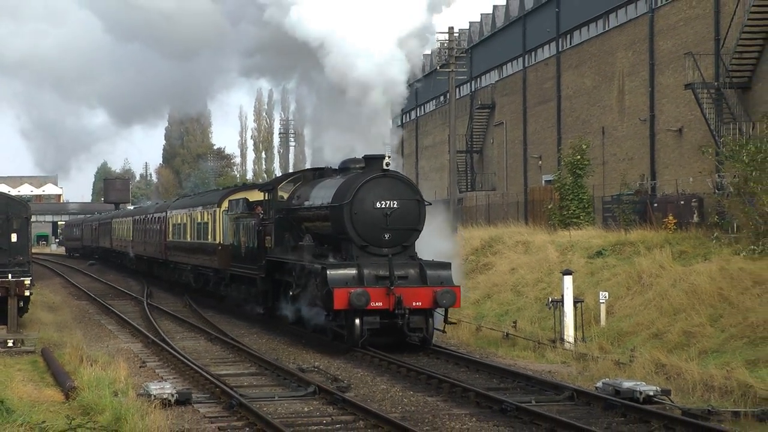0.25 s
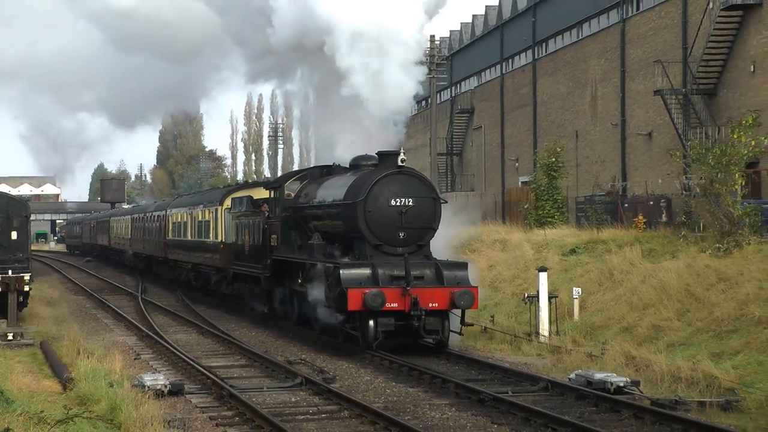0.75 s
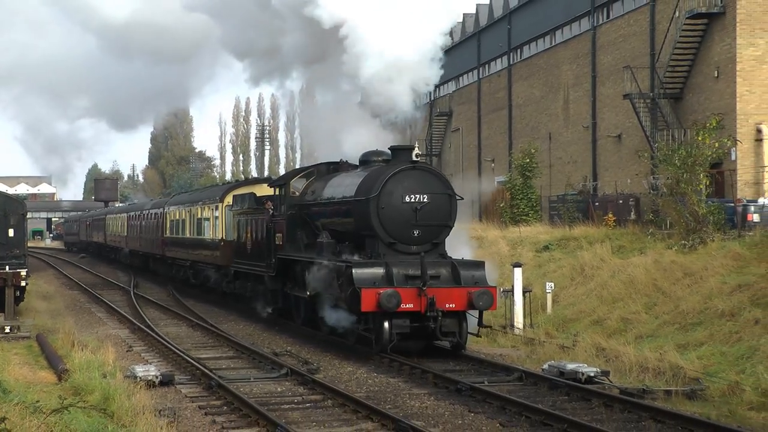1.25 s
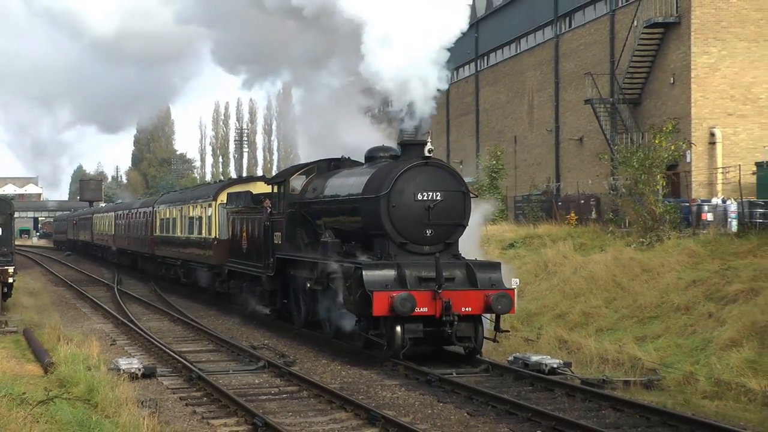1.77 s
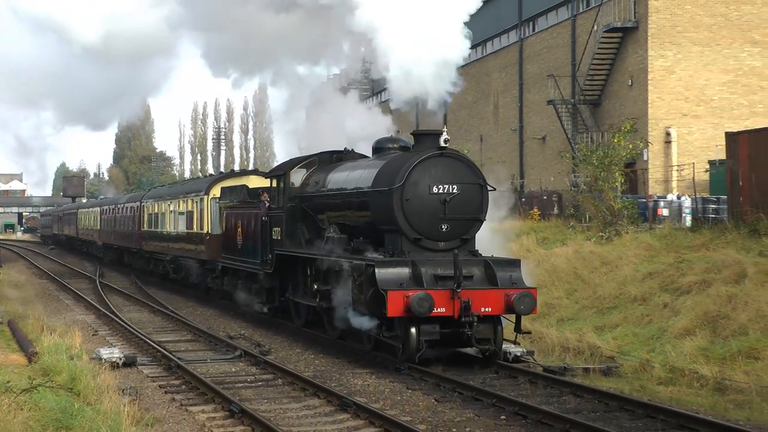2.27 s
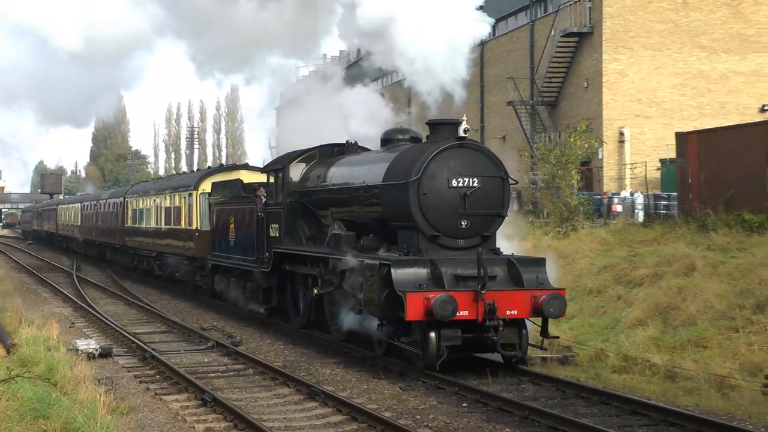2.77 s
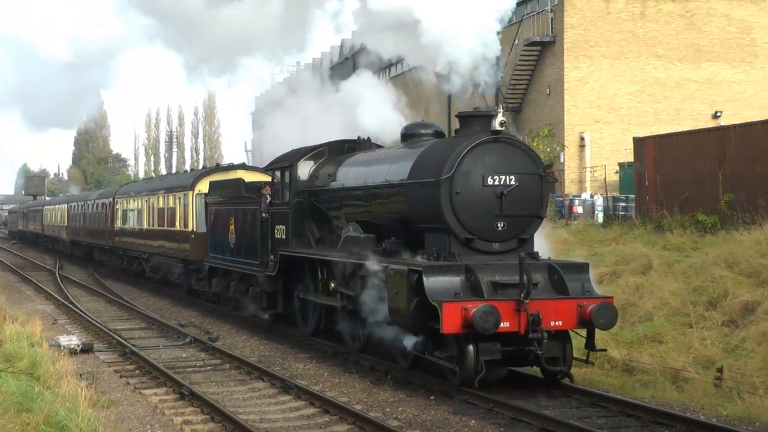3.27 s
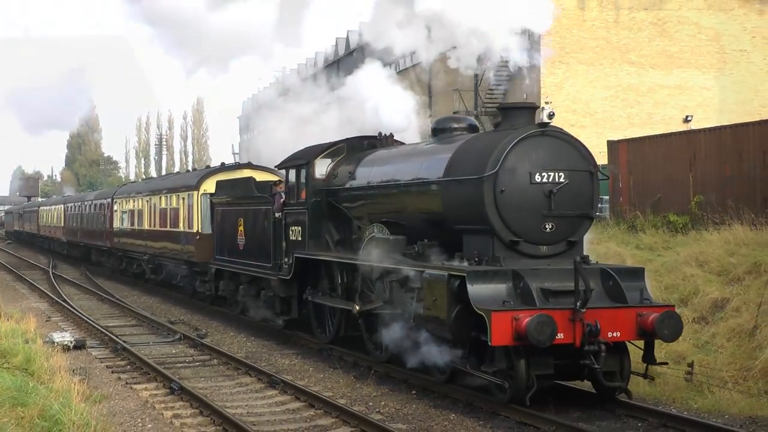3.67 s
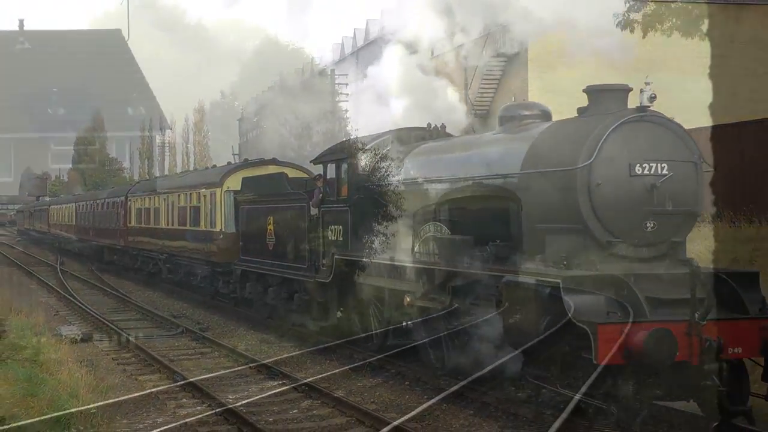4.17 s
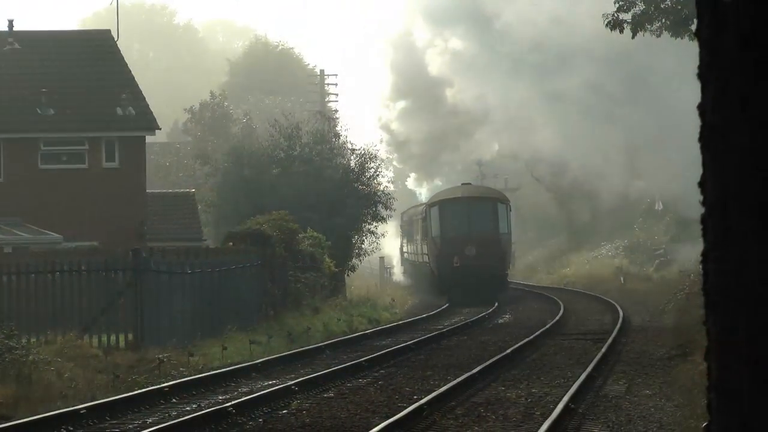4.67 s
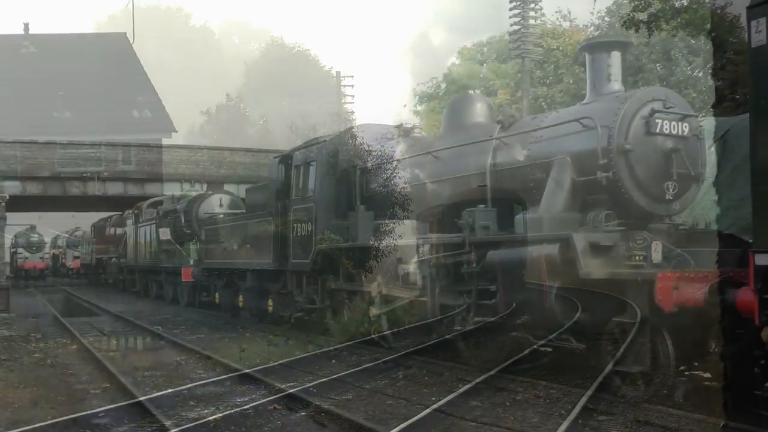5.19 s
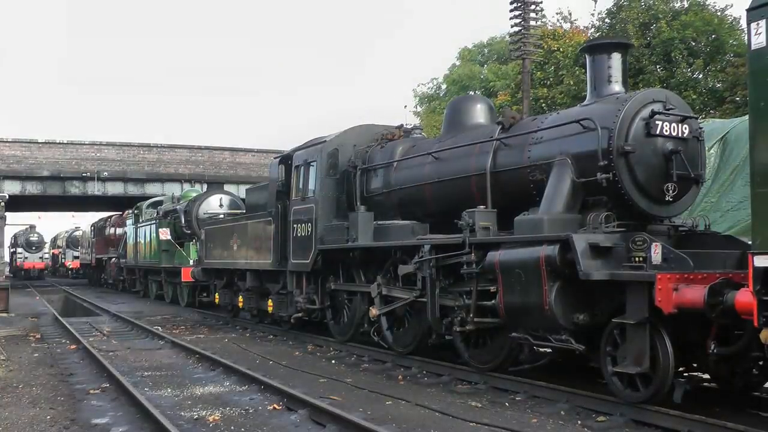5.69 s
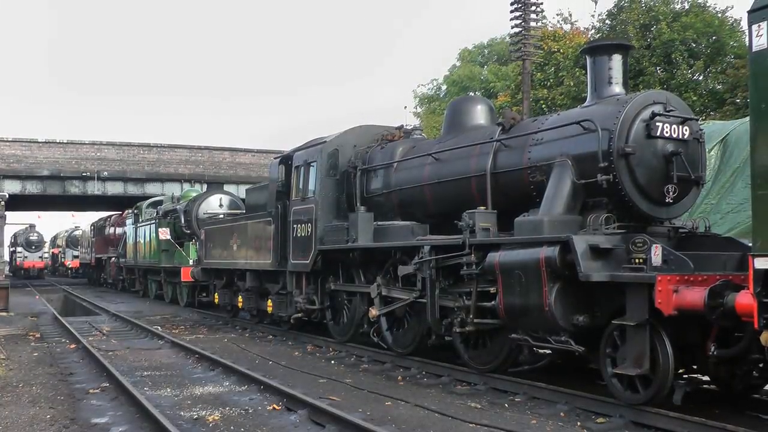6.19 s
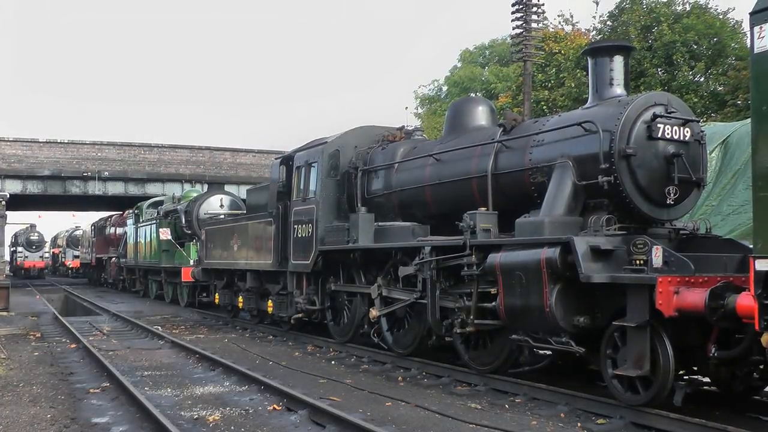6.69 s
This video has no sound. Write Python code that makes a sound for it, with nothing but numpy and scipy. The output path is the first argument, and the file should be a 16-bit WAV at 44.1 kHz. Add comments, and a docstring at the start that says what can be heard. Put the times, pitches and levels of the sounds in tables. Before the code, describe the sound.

Outdoors beside a railway, a steam engine pulls close by with rapid hollow chuffs, about five a second, over rumbling wheels and dense hissing steam. It fades quickly into a faint, dull train far off. A thin bird whistle breaks into a trill, then a magpie chatters in a quiet yard with slight rustles and soft bumps. Wide stereo microphone.

```python
"""A steam locomotive pulls past: five exhaust beats a second excite chimney resonances, a broad roar and a thud,
over rumbling wheels and leaking steam, which is shaped noise that dips around the beats.
The engine fades into a far train, made of duller noise, as faint beats go on to 5.4 s.
Near 5.2 s come light rustles and a bird's whistled sine that breaks into a trill; a quiet yard of drone and air rises.
A magpie then chatters in bursts of resonant noise with echoes, among further rustles and soft decaying bumps."""
import sys
import numpy as np
from scipy import signal
from scipy.fft import rfft, irfft, next_fast_len
from scipy.io import wavfile
from scipy.ndimage import uniform_filter1d, map_coordinates

SR = 44100
rng = np.random.default_rng(int(sys.argv[2]) if len(sys.argv) > 2 else 0)


def to_wav(sig):
    """Store sig (one row per channel, or 1-D mono) as 16-bit WAV at the path in sys.argv[1].

    Samples outside -1..1 are clipped; the rate is SR.
    """
    pcm = np.clip(np.atleast_2d(sig), -1, 1) * 32767
    pcm = np.round(pcm).astype(np.int16)
    wavfile.write(sys.argv[1], SR, pcm.T)  # frames by channels


N = 306081
TIME = np.arange(N) / SR

# Exhaust beats; each layer shifts the centre and scales the half length, and the hiss ducks duck_after_s later:
# centre_s, half_s, low_mode_db, upper_mode_db, thud_db, duck_after_s, duck_depth_db
EXHAUST_BEATS = [(0.097, 0.047, -17.5, -22.5, -18.5, 0, 1), (0.284, 0.063, -19, -21, -24, 0.0048, 2),
                 (0.539, 0.031, -16, -22.5, -20, 0, 2), (0.722, 0.055, -21, -23, -28, -0.0015, 0.2),
                 (0.916, 0.038, -16, -24, -19, 0.0073, 4.5), (1.118, 0.045, -22, -24.5, -27.5, 0.022, 1),
                 (1.32, 0.046, -15, -22.5, -24, 0.012, 4.5), (1.515, 0.036, -14.7, -21.5, -20, 0.015, 3),
                 (1.759, 0.042, -15.5, -18.5, -21, -0.0058, 2.5),
                 (1.911, 0.041, -13.5, -24.5, -23.5, .04, 2.5), (2.126, 0.041, -13, -18, -20, .02, 3.5),
                 (2.311, 0.03, -15.5, -23.5, -22, -0.0084, 2.4),
                 (2.533, 0.041, -17.5, -19.5, -35, .01, 2.5), (2.717, 0.042, -14.5, -21, -42, -0.022, 2.5),
                 (2.938, 0.046, -16, -18, -30.5, 0, 2), (3.106, 0.045, -15, -21.5, -28, 0.0022, 1),
                 (3.31, 0.05, -16, -21.3, -32, .02, 3), (3.489, 0.029, -18.5, -26, -20, 0.014, 3),
                 (3.715, 0.043, -15.8, -18, -26, 0, 4), (3.902, 0.05, -15, -22.5, -27, 0.0039, 3),
                 (4.099, 0.039, -17, -24, -37, .045, 3), (4.26, 0.038, -19.5, -30, -24, 0.005, 0.5),
                 (4.466, 0.033, -17.5, -25.5, -27, -0.013, 3.5), (4.625, 0.056, -32, -34.5, -31, .03, 2),
                 (4.841, 0.036, -44, -47, -50, 0, 0), (5.086, 0.028, -40, -42.5, -51, 0, 0),
                 (5.215, 0.033, -43, -49, -64, 0, 0), (5.41, 0.067, -56.5, -51, -61.5, 0, 0)]
# Chimney resonances, two low then two upper: centre_hz, width_hz
CHIMNEY_MODES = [(235, 31), (290, 109), (596, 43), (640, 365)]
# Spectrum of the exhaust thud: frequency_hz, relative_level_db (per Hz)
THUD_SPECTRUM = [(25, -41.5), (50, -5.5), (100, -2.5), (150, -3), (220, -22), (400, -62)]
ROAR_DB = -7.5  # broad roar of a blast, over the upper mode

# Levels of the near engine: time_s, rumble_db, hiss_db, fizz_db, low_howl_db
ENGINE_LEVELS = [(0, -22, -21.5, -27, -21.5), (.4, -20, -22.5, -28, -23), (.85, -21, -22, -27.5, -21.5),
                 (1.3, -21, -20, -26, -24), (2, -23, -22, -28, -25), (2.5, -19.5, -19.5, -26, -22),
                 (2.95, -23, -23, -28, -24.5), (3.3, -21.5, -21, -25, -26.5), (3.7, -20, -20, -22.5, -25.5),
                 (4.1, -19.5, -21.5, -25, -31.5), (4.4, -20.5, -23, -24.5, -37)]
# Howling leaks; middle and high levels are over the hiss:
# time_s, low_hz, middle_hz, middle_db, high_hz, high_db
HOWL_PATHS = [(0, 1411, 1780, -5, 2980, -12), (.5, 1426, 1807, -6, 2986, -4.5),
              (1.1, 1398, 1782, -6, 3140, -6.5), (1.4, 1375, 1770, -13, 3130, -9.5),
              (1.9, 1383, 1964, -9, 2890, -7.5), (2.7, 1363, 1800, -2.5, 3020, -16),
              (3, 1370, 1693, -17, 2945, -13), (3.4, 1478, 1940, -8.5, 2930, -7.5),
              (3.8, 1457, 1914, -25, 2950, -19), (4.05, 1480, 1695, -10, 2826, -8.5),
              (4.7, 1444, 1820, -7, 2755, -5)]
# Spectra of the wheel rumble, the body of the hiss and the fizz: frequency_hz, relative_level_db (per Hz)
RUMBLE_SPECTRUM = [(15, -50), (25, -13.5), (80, 0.5), (162, -2), (224, -1), (394, -10.5), (595, -6.5),
                   (913, -13.5), (1160, -14), (1380, -9), (1500, -24), (1950, -47), (3300, -120)]
HISS_SPECTRUM = [(470, -32), (800, -18), (1150, -15), (1380, -23.5), (1590, -8.5), (2560, -11.5),
                 (2960, -11.5), (3920, -15), (7000, -17), (9100, -22.5), (15400, -120)]
FIZZ_SPECTRUM = [(3500, -34), (5500, -17), (7000, -2.5), (8500, 0.5), (9600, -0.5), (11500, -7),
                 (12500, -17), (15800, -46.5)]
# Fade-out of the near engine: time_s, gain_db
ENGINE_FADE = [(4.2, 0), (4.4, -2.5), (4.5, -6.5), (4.65, -13.5), (4.72, -21), (4.755, -46), (4.76, -120)]
WHEELS_DB = -13.5  # over the rumble
SIZZLE_DB, SIZZLE_FOLLOWS = -38.5, 0.6  # level at the start before ducking; dB per dB of fizz change and ducking
DUCK_S, RECOVER_S = 0.011, 0.11  # time scales of the fall and of the way back
FIZZ_DUCKS, HOWL_DUCKS = 1.14, 0.24  # dB of ducking per dB in the hiss

# Magpie syllables: centre_s, level_db
MAGPIE_SYLLABLES = [(5.354, -53.8), (5.451, -53.9), (5.542, -54.5), (5.683, -54.5), (5.781, -53),
                    (5.883, -53), (5.986, -54.5), (6.083, -54), (6.226, -57), (6.309, -58)]
# Resonances of the beak: centre_hz, width_hz, gain_db
BEAK_MODES = [(2400, 760, -3), (3260, 820, -5), (5500, 1700, -15)]
SYLLABLE_S = 0.023  # half length

# Path of the small bird's note: time_s, pitch_hz, level_db
CHIRP_PATH = [(5.221, 5640, -58), (5.229, 5510, -49), (5.254, 5510, -43), (5.3, 5420, -46),
              (5.36, 5430, -54), (5.436, 5460, -60)]
TRILL_FROM_S, TRILL_HZ, TRILL_DEPTH = 5.268, 79.4, 0.87  # the clear note breaks up here
FLUTTER_HZ = 120  # scale of the random pitch shake, strongest in the dips of the trill

# Brief rustles: centre_s, half_s, centre_hz, width_hz, level_db
RUSTLE_EVENTS = [(5.077, .006, 9000, 3000, -60), (5.095, 0.0033, 9000, 5000, -56),
                 (5.109, .004, 8500, 11000, -48.5), (5.1, .012, 3500, 1500, -51),
                 (5.84, .004, 7000, 4000, -64), (5.98, .004, 6500, 4000, -66),
                 (6.28, .004, 4500, 6000, -59), (6.298, .01, 3200, 2000, -57),
                 (6.77, .025, 3780, 4000, -60)]
# Soft bumps: start_s, pitch_hz, peak_db
BUMP_EVENTS = [(6.326, 330, -36), (6.344, 260, -37), (6.376, 200, -43), (6.402, 290, -42),
               (6.413, 280, -40), (6.43, 290, -38), (6.445, 260, -39)]

# Levels of the far train: time_s, rumble_db, steam_db
FAR_LEVELS = [(4.8, -41.5, -45), (5.04, -46.5, -46), (5.29, -42.5, -47), (5.47, -48, -52.5),
              (5.62, -50, -56)]
# Spectra of the far rumble and the far steam: frequency_hz, relative_level_db (per Hz)
FAR_RUMBLE_SPECTRUM = [(15, -63), (25, -29), (45, -9), (237, -2.5), (483, -8), (593, -6), (652, -8.5),
                       (1100, -24), (1430, -47), (2420, -120)]
FAR_STEAM_SPECTRUM = [(500, -25), (850, -8), (1100, -3), (1500, -4), (1850, 1.5), (2200, -4), (2800, -6),
                      (3600, -11), (4300, -18), (6000, -24), (15800, -38)]

# Levels of the yard: time_s, drone_db, air_db
YARD_LEVELS = [(5.45, -50, -55.5), (5.65, -50.5, -55.5), (6.3, -50, -56.5), (6.41, -46, -57),
               (6.84, -49, -56.5), (6.94, -48, -56.5)]
# Spectra of the town drone and the air: frequency_hz, relative_level_db (per Hz)
DRONE_SPECTRUM = [(15, -53), (25, -21), (76, -3.5), (209, -4.5), (244, -2.5), (273, -5.5), (375, -6),
                  (491, -14.5), (729, -15), (1100, -36), (1430, -64), (2420, -120)]
AIR_SPECTRUM = [(470, -14.5), (800, -3), (873, -17), (1220, -13), (1300, -17), (1690, -14), (1850, -13),
                (3900, -22), (4160, -21), (15800, -37)]

# Likeness of left and right: frequency_hz, correlation (0 to 1)
STEREO_LIKENESS = [(60, .99), (250, 0.99), (600, 0.93), (900, 0.87), (1300, 0.7), (2000, 0.61),
                   (2800, 0.53), (4500, 0.8), (7300, 0.81), (9900, 0.56), (13000, .25), (15800, .15)]
# Balance of the channels: frequency_hz, left_minus_right_db
STEREO_BALANCE = [(60, -2), (110, 1), (200, -1.5), (380, 1.5), (700, -1.0), (1290, -1), (2380, -2.0),
                  (4400, -1.5), (8120, -0.5), (15000, 4)]
# Phase between the channels: frequency_hz, left_lead_rad
STEREO_LEAD = [(20, 0), (500, 0), (1350, -.45), (2400, -.2), (3300, .1), (7000, .05), (8700, .3),
               (10000, .9), (12000, 1.4), (15800, 3)]
TOP_HZ = 15790  # band limit


def exhaust():
    """Forced resonance: each blast of steam up the chimney excites its pipe modes, a broad roar and a thud."""
    centre, half, low_db, upper_db, thud_db = np.transpose(EXHAUST_BEATS)[:5]
    low_1, low_2, upper_1, upper_2 = [band(hz, width, patchy_db=1.0) for hz, width in CHIMNEY_MODES]
    eddies = amp(1.5 * wobble(45))  # the jet breaks into lumps

    low_tone = evened(eddies * unit(low_1 + amp(-3.5) * low_2), seconds=0.047)
    low = low_tone * puffs(centre - 0.006, half, low_db, lean=0.32, firm=2.8)

    # The upper modes and roar lead the low modes: the jet is at full speed first.
    upper_tone = evened(eddies * unit(upper_1 + amp(-0.5) * upper_2), seconds=0.035)
    upper = upper_tone * puffs(centre - 0.012, 1.06 * half, upper_db, lean=0.26, firm=2.4)
    roar_swell = puffs(centre - 0.013, 0.59 * half, upper_db + ROAR_DB, lean=0.33)
    roar = roar_swell * band(874, 700, patchy_db=0.5)

    thud_noise = evened(rush(THUD_SPECTRUM, patchy_db=4.0), seconds=0.11)
    thud = thud_noise * puffs(centre, 0.85 * half, thud_db)
    return low + upper + roar + thud


def near_engine():
    """Turbulent jet noise: leaks hiss, fizz and howl in three drifting bands, over rolling rumble of the wheels."""
    rumble_db, hiss_db, fizz_db, low_db = curves(ENGINE_LEVELS)
    low_hz, middle_hz, middle_db, high_hz, high_db = curves(HOWL_PATHS)
    duck_db = ducking()
    hiss_db = hiss_db + duck_db
    sizzle_db = SIZZLE_DB + SIZZLE_FOLLOWS * (fizz_db - fizz_db[0] + duck_db)

    wheels = amp(WHEELS_DB) * band(870, 510, patchy_db=2.0)
    rumble = amp(rumble_db) * (rush(RUMBLE_SPECTRUM, patchy_db=3.0) + wheels)

    flutter = amp(0.34 * wobble(20))
    hiss = amp(hiss_db) * flutter * rush(HISS_SPECTRUM, patchy_db=1.3)
    fizz = amp(fizz_db + FIZZ_DUCKS * duck_db) * flutter * rush(FIZZ_SPECTRUM, patchy_db=0.85)
    sizzle = amp(sizzle_db) * band(12800, 5000, patchy_db=1.5)  # the finest leaks hold steadier

    low = amp(low_db + HOWL_DUCKS * duck_db) * moving_band(low_hz, 240, patchy_db=1.3)
    middle = amp(hiss_db + middle_db) * moving_band(middle_hz, 200, patchy_db=2.0)
    high = amp(hiss_db + high_db) * moving_band(high_hz, 250, patchy_db=2.5)

    fade = amp(curves(ENGINE_FADE)[0])
    return (rumble + hiss + fizz + sizzle + low + middle + high) * fade


def ducking():
    """Amplitude modulation: the hiss falls around each beat and recovers exponentially (dB)."""
    duck_db = 0
    for centre, *_, after, depth in EXHAUST_BEATS:
        t = TIME - centre - after
        fall = (1 + np.tanh(t / DUCK_S)) / 2
        recovery = np.exp(-np.maximum(t, 0) / RECOVER_S)
        duck_db = duck_db - depth * recovery * fall
    return duck_db


def magpie():
    """Source and filter: rasping noise is coloured by beak resonances, then blurred by echoes of the yard."""
    centre, db = np.transpose(MAGPIE_SYLLABLES)
    rasp = rng.standard_normal(N) * amp(1.8 * wobble(350))

    def beak(f):
        """Parallel resonances: squared modes add with alternating sign."""
        return sum((-1) ** k * amp(gain_db) * mode(hz, width)(f) ** 2
                   for k, (hz, width, gain_db) in enumerate(BEAK_MODES))

    call = unit(filtered(rasp, beak)) * puffs(centre, SYLLABLE_S + 0 * centre, db)
    return call * [[1], [0.4]] + amp(-3.5) * echo(call, t60=0.89)


def small_bird():
    """Frequency and amplitude modulation: a thin whistle breaks into a fading trill, scattered by trees."""
    hz, db = curves(CHIRP_PATH)
    singing = ramp(5.218, 5.221) * ramp(5.44, 5.436)
    beat = np.cos(2 * np.pi * TRILL_HZ * (TIME - TRILL_FROM_S) + 1.8 * wobble(35))
    trill = 1 - TRILL_DEPTH * ramp(TRILL_FROM_S - 0.004, TRILL_FROM_S) * (1 + beat) / 2
    shaken_hz = hz + FLUTTER_HZ * (1 - trill) * wobble(70)
    whistle = np.sqrt(2) * np.sin(2 * np.pi * np.cumsum(shaken_hz) / SR)  # rms 1
    note = amp(db) * trill * whistle * singing
    return note * [[1], [0.3]] + amp(-10) * echo(note, t60=0.3)


def close_noises():
    """Transient excitation: rustles are brief bands of noise, soft bumps are short decaying sines."""
    out = 0
    for centre, half, hz, width, db in RUSTLE_EVENTS:
        out = out + puffs([centre], [half], [db]) * band(hz, width, patchy_db=2.0)
    for start, hz, db in BUMP_EVENTS:
        swell = puffs([start + 0.001], [0.003], [db], lean=0.45)
        out[0] += swell * np.sin(2 * np.pi * hz * (TIME - start))
    return out


def far_train():
    """Attenuation with distance: a dull rumble and soft steam remain."""
    rumble_db, steam_db = curves(FAR_LEVELS)
    rumble = amp(rumble_db) * rush(FAR_RUMBLE_SPECTRUM, patchy_db=1.5)
    steam = amp(steam_db) * rush(FAR_STEAM_SPECTRUM, patchy_db=2.1)
    return (rumble + steam) * ramp(4.13, 4.72) * ramp(5.63, 5.5)


def yard():
    """Diffuse ambient noise: a low drone of the town and a thin veil of air."""
    drone_db, air_db = curves(YARD_LEVELS)
    drone = amp(drone_db) * rush(DRONE_SPECTRUM, patchy_db=0.0)
    air = amp(air_db) * rush(AIR_SPECTRUM, patchy_db=1.0)
    return (drone + air) * ramp(5.07, 5.54)


def echo(x, t60):
    """Diffuse reverberation: two unrelated noise tails fall by 60 dB in t60 seconds."""
    t = np.arange(SR // 2) / SR
    tail = rng.standard_normal((2, len(t))) * amp(-60 * t / t60)
    return signal.fftconvolve(x[None], tail / np.linalg.norm(tail[0]), axes=1)[:, :N]


def turbulence(patchy_db):
    """Intermittency: two unrelated white noises share time-frequency patches of random gain."""
    z = signal.stft(rng.standard_normal((2, N)), nperseg=512)[2]
    field = rng.standard_normal(z.shape[1:])
    field = uniform_filter1d(field, 5, 0)
    field = uniform_filter1d(field, 10, 1)
    return signal.istft(z * amp(patchy_db * unit(field)), nperseg=512)[1][:, :N]


def rush(spectrum, patchy_db):
    """Spectral shaping: turbulence coloured by a table of levels, rms 1."""
    return unit(filtered(turbulence(patchy_db), lambda hz: amp(along(spectrum, hz))))


def mode(hz, width_hz):
    """Damped oscillator: the complex response of one causal resonance."""
    return lambda f: 1j * f * width_hz / (hz * hz - f * f + 1j * f * width_hz)


def band(hz, width_hz, patchy_db):
    """Cascaded resonance: turbulence through the same mode twice, rms 1."""
    return unit(filtered(turbulence(patchy_db), lambda f: mode(hz, width_hz)(f) ** 2))


def moving_band(hz, width_hz, patchy_db):
    """Quadrature modulation: slow noise on a gliding carrier makes a flat-topped band around hz, rms 1."""
    def slow():
        """Low-pass filtering: turbulence is kept below about half the band width."""
        return filtered(turbulence(patchy_db), lambda f: 1 / (1 + (2 * f / width_hz) ** 4))

    phase = 2 * np.pi * np.cumsum(hz) / SR
    return unit(slow() * np.cos(phase) + slow() * np.sin(phase))


def puffs(centre, half, db, lean=0, firm=2):
    """Bell envelopes: lean > 0 slows the fall, firm > 2 flattens the top and steepens the edges."""
    out = np.zeros(N)
    for c, h, level in zip(centre, half, db):
        near = slice(max(round((c - 0.25) * SR), 0), round((c + 0.25) * SR))
        u = (TIME[near] - c) / h
        stretch = 1 + np.clip(lean, 0, 0.8) * np.tanh(u)
        out[near] += amp(level) * np.exp(-0.5 * np.abs(u / stretch) ** firm)
    return out


def evened(x, seconds):
    """Energy normalisation: rms near 1 over each such stretch, so that each blast carries its full energy."""
    power = np.abs(uniform_filter1d(x ** 2, int(seconds * SR)))
    return x / np.sqrt(power + 0.021)


def wobble(rate):
    """Random modulation: a smooth curve with rate random knots a second."""
    return map_coordinates(rng.standard_normal(int(N * rate / SR) + 4), [TIME * rate])


def filtered(x, response):
    """Linear filtering: the spectrum of x times a complex response of frequency."""
    m = next_fast_len(N + SR // 2)
    return irfft(rfft(x, m) * response(np.fft.rfftfreq(m, 1 / SR)), m)[..., :N]


def along(points, hz):
    """Logarithmic frequency scale: interpolates (Hz, value) points."""
    f, v = np.transpose(points)
    return np.interp(np.log(hz + 1), np.log(f + 1), v)


def curves(rows):
    """Linear interpolation: one value a sample for each column after the time."""
    s, *cols = np.transpose(rows)
    return [np.interp(TIME, s, c) for c in cols]


def ramp(start, end):
    """Linear fade: rises from 0 to 1 between two times (falls if they are swapped)."""
    return np.clip((TIME - start) / (end - start), 0, 1)


def amp(db):
    """Decibel law: dB to amplitude gain."""
    return 10 ** (np.asarray(db) / 20)


def unit(x):
    """Mean-square normalisation: scales to rms 1."""
    return x / np.sqrt(np.mean(x ** 2) + 1e-20)


def scene():
    """Interchannel coherence: two versions of all the sources blend into a left and right pair."""
    a, b = exhaust() + near_engine() + magpie() + small_bird() + close_noises() + far_train() + yard()

    def turn(hz):
        """Mixing angle: half the arc cosine of the wanted correlation."""
        return np.arccos(np.clip(along(STEREO_LIKENESS, hz), 0, 1)) / 2

    def ports(hz):
        """Interchannel differences: level and phase are split evenly, with opposite signs."""
        sign = np.array([[1], [-1]])
        return amp(along(STEREO_BALANCE, hz) / 2 * sign) * np.exp(0.5j * along(STEREO_LEAD, hz) * sign)

    mid = filtered(a, lambda hz: np.cos(turn(hz)))
    side = filtered(b, lambda hz: np.sin(turn(hz)))
    return filtered(np.array([mid + side, mid - side]), ports)


def record(dry):
    """Band limiting and saturation: the microphone cuts deep bass, peaks round off, the top is cut at TOP_HZ."""
    thin = filtered(dry, lambda hz: (1j * hz / (34 + 1j * hz)) ** 2)
    soft = thin / (1 + np.abs(thin / 0.99) ** 6) ** (1 / 6)
    return filtered(soft, lambda hz: hz < TOP_HZ)


dry = scene()
out = record(dry)
to_wav(out)
```